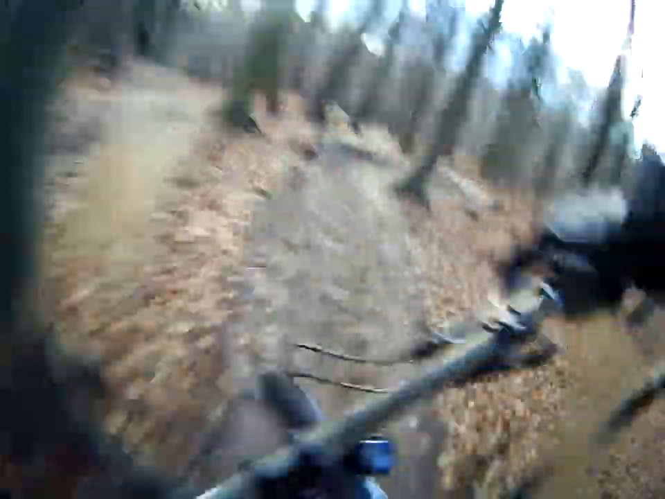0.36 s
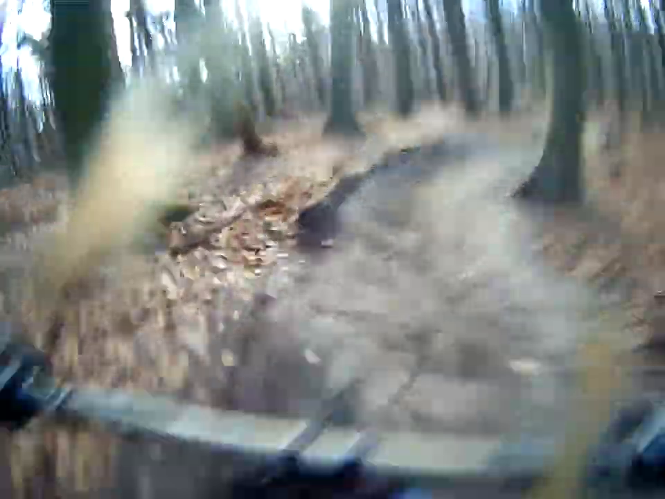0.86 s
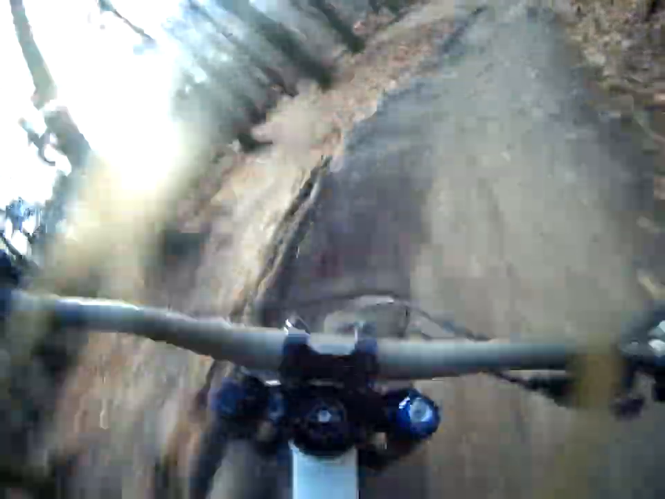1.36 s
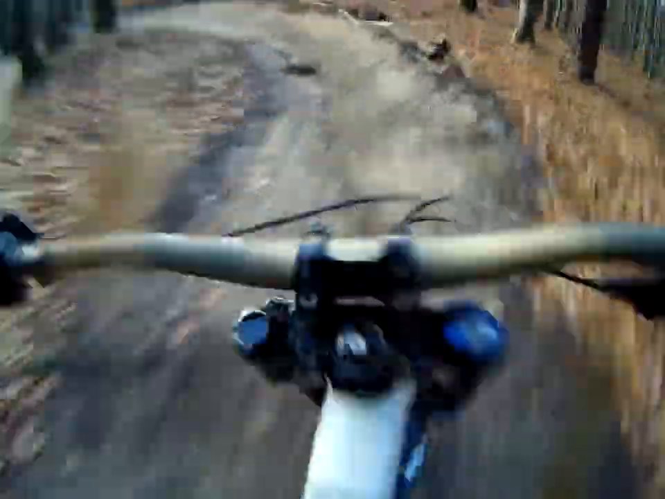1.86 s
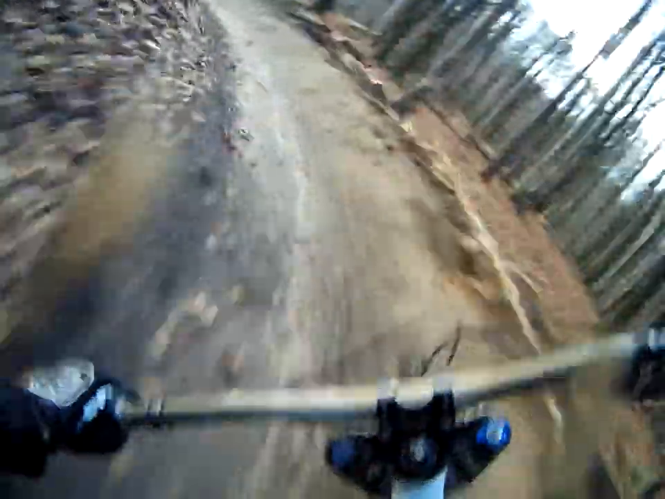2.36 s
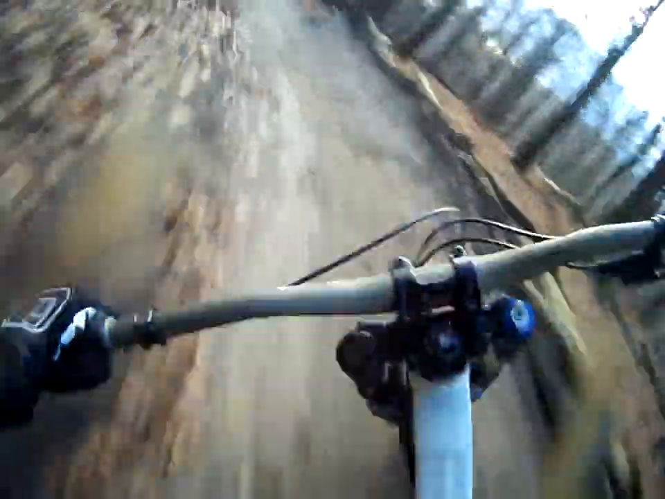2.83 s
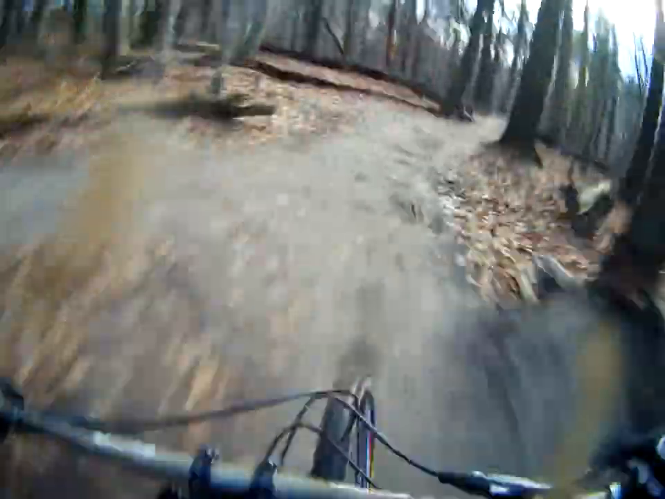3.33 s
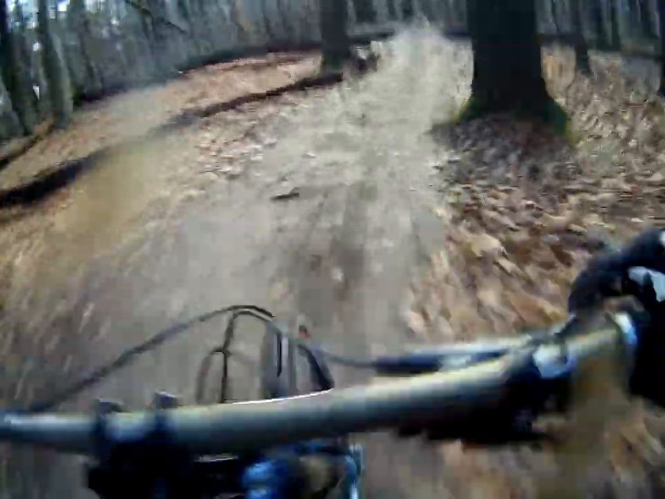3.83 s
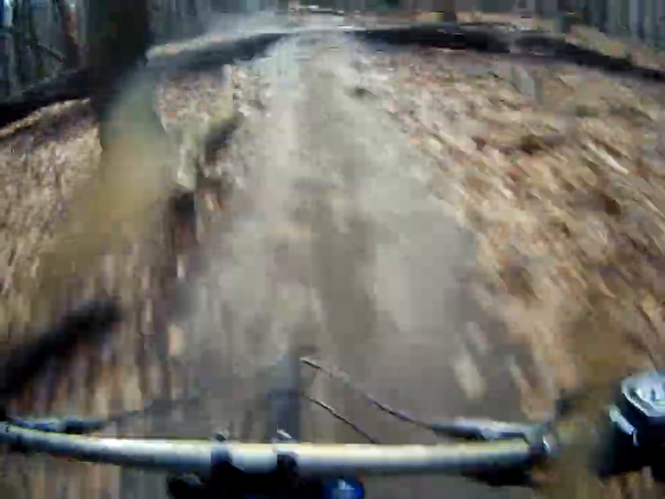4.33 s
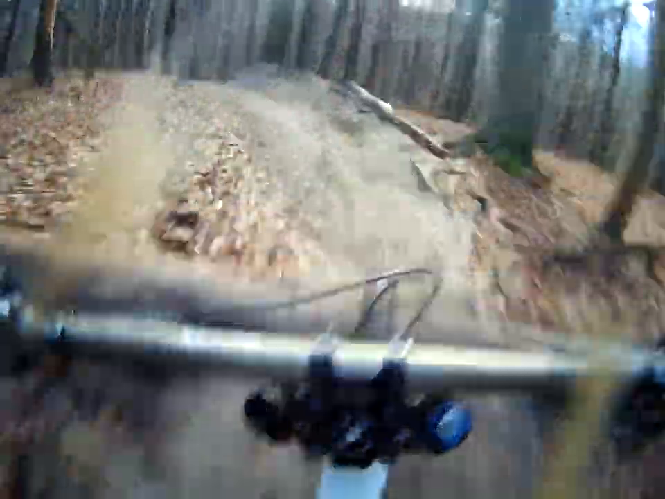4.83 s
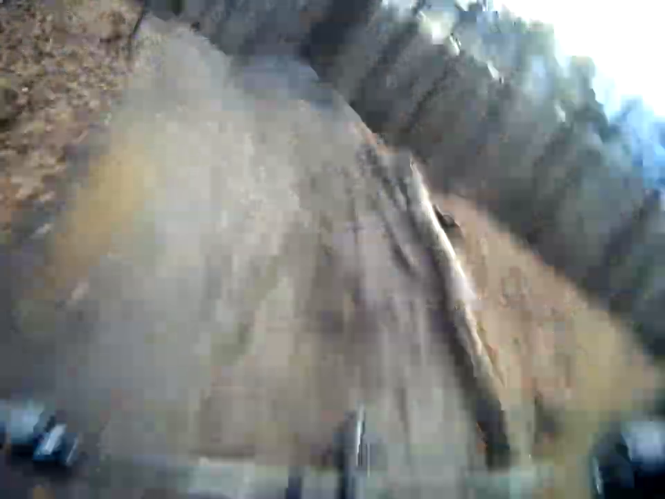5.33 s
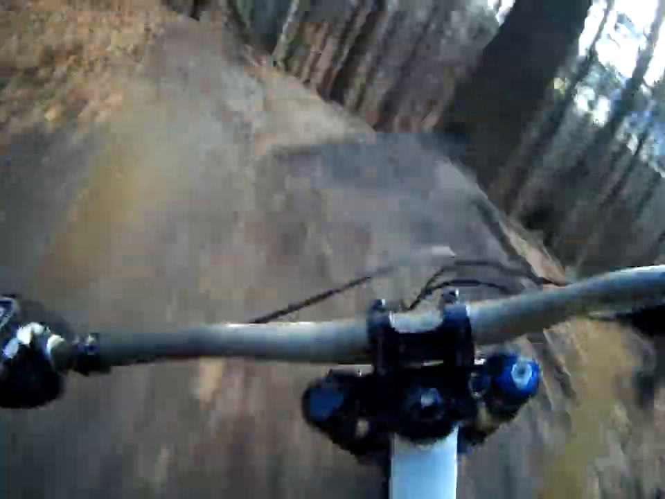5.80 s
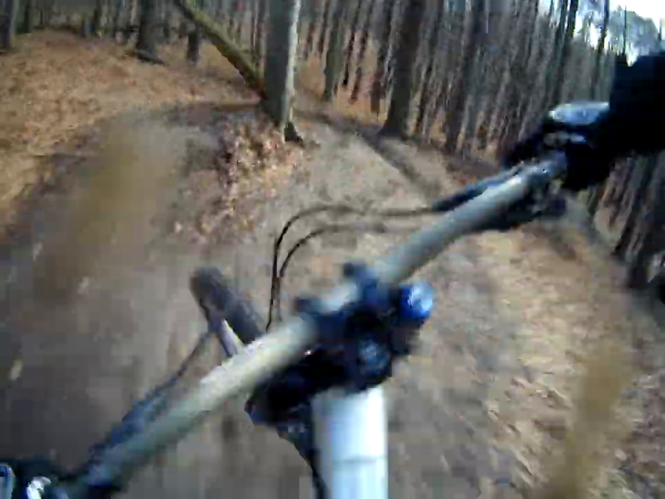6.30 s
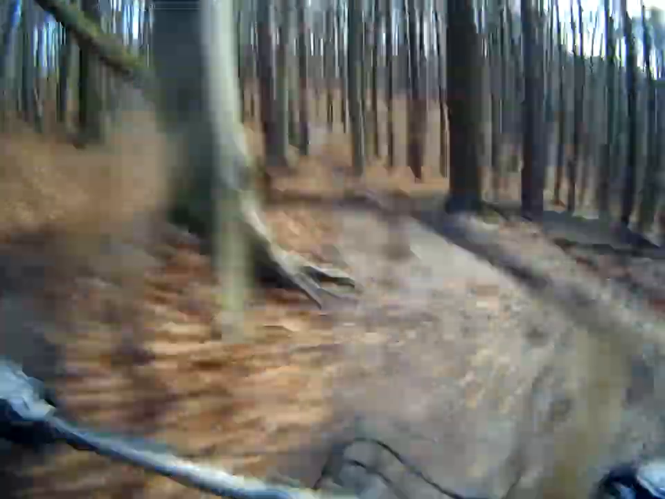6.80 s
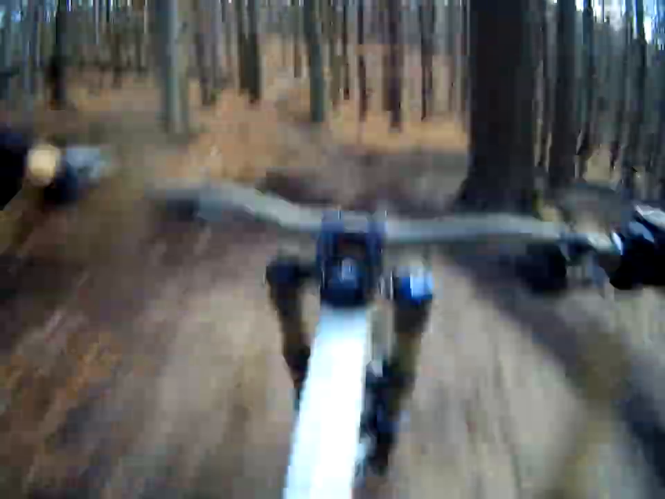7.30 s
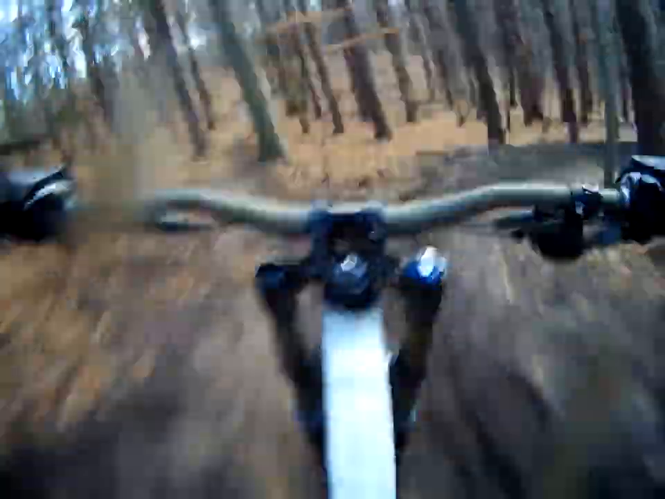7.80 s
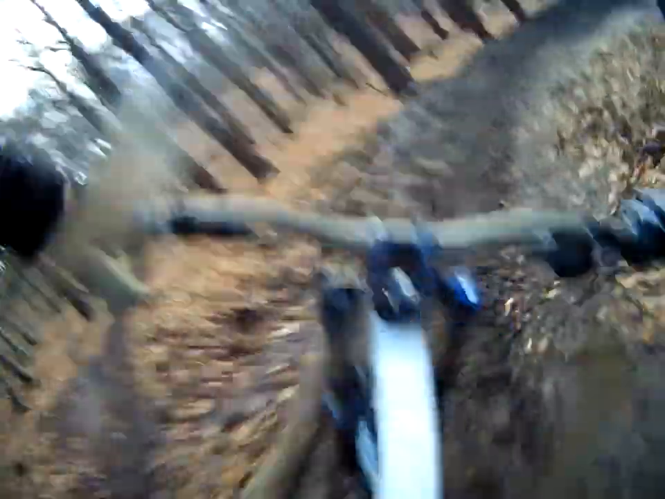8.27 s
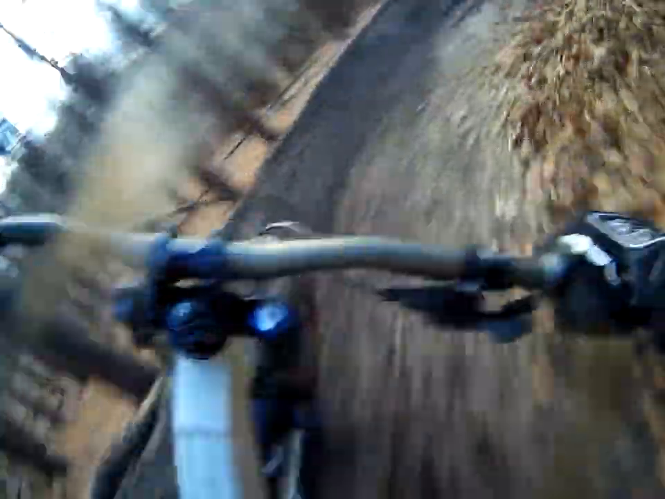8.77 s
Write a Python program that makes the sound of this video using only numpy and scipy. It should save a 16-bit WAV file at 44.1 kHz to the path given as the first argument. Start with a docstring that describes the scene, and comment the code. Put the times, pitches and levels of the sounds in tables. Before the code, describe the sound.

A mountain bike tears down a leafy dirt trail, tyres rumbling and crunching, with boxy clacks, ticks and one heavy jolt close to the microphone.

```python
"""Tyres rumble and crunch fast down a leafy forest trail, with jolts, clacks and ticks close to the microphone.
The bike is heard from inside a sealed plastic case on the rider's chest: shaped noise makes wind, tyres and
rattle, scattered impacts make the grit, and single blows ring the same decaying case resonances.
One microphone feeds two unequal amplifier channels, each with its own offset."""
import sys
import numpy as np
from scipy import signal
from scipy.io import wavfile
from scipy.ndimage import uniform_filter1d

SR = 44100
rng = np.random.default_rng(int(sys.argv[2]) if len(sys.argv) > 2 else 0)


def to_linear_factor(level_db):
    """Convert decibel levels (scalar or array-like) to linear amplitude factors."""
    exponent = np.asarray(level_db, float) / 20
    return 10 ** exponent


def generate_wav(sig):
    """Save sig (samples, or channels by samples) to the path in sys.argv[1] as 16-bit PCM at SR."""
    pcm = np.round(np.clip(np.atleast_2d(sig).T, -1, 1) * 32767).astype(np.int16)
    wavfile.write(sys.argv[1], SR, pcm)


N = 392490
T = np.arange(N) / SR
# resonances of case and harness, levels relative: f/Hz, level/dB, t60/s at damping 1
CASE_MODES = [(84.6, -2.5, 0.14), (289, 0, 0.04), (392.4, 29, 0.02), (514, -21, 0.04), (742, 8.5, 0.051),
              (790, 11, 0.0067), (1092, 5, 0.032), (1710, 3, 0.011), (2050, -3.5, 0.022),
              (2392, -3.5, 0.016), (3190, -13.5, 0.0091), (3860, -13, 0.012), (4730, -7.5, 0.0045),
              (5480, -7.5, 0.0025), (6530, -11, 0.015), (6950, -15.5, 0.0043), (8130, -32.5, 0.015),
              (7960, -28, 0.011), (12500, -50, .003)]


def band(x, lo_hz, hi_hz, order=2):
    """Band-pass, scaled to unit rms."""
    y = signal.sosfilt(signal.butter(order, [lo_hz, hi_hz], "bandpass", fs=SR, output="sos"), x)
    return y / np.std(y)


def walk(rate):
    """Random levels held 1 / rate s and slewed; it dips freely but its peaks are rounded off."""
    hold = int(SR / rate)
    steps = np.repeat(rng.standard_normal(N // hold + 1), hold)
    w = 1.1 * uniform_filter1d(uniform_filter1d(steps, hold), hold)[:N]
    return np.where(w > 0, np.tanh(w), w)


def swells(table):
    """Sum of bell-shaped level swells, from rows of t/s, level/dB, half length/s."""
    return sum(to_linear_factor(db) * np.exp(-((T - s) / half) ** 2) for s, db, half in table)


def trail(column):
    """One level curve of the trail, in dB at every sample, sinking while the wheels fly."""
    # along the trail: t/s, crunch of leaves and stones level/dB, tyre rumble level/dB,
    # wind push level/dB, rattle of frame and chain level/dB
    course = np.transpose([(0.0, -57, -68, -56, -61), (0.22, -54, -56, -50, -56.5),
                           (0.35, -58, -56.5, -44, -55.5), (0.49, -66, -60, -55, -64.5),
                           (0.67, -63, -67, -62, -62), (0.79, -60, -66, -56, -60.5),
                           (0.94, -53.5, -54.5, -51, -54), (1.04, -54.5, -55.5, -49, -53.5),
                           (1.21, -58, -58, -61, -55), (1.41, -54, -62.5, -50, -57.5),
                           (1.53, -51.5, -54.5, -50, -54), (1.66, -52.5, -55, -47, -55.5),
                           (1.83, -58.5, -60.5, -62, -58.5), (2.05, -60.5, -60.5, -65, -60),
                           (2.3, -59.5, -60, -58.5, -59.5), (2.77, -59, -62.5, -59.5, -62.5),
                           (2.97, -60.5, -58, -66, -60), (3.3, -61.5, -65.5, -56, -59),
                           (3.49, -58, -60.5, -68, -61.5), (3.67, -59, -63, -73, -62.5),
                           (3.74, -60.5, -65, -67, -61), (4.21, -60, -60.5, -56, -61),
                           (4.34, -59, -59.5, -58, -60.5), (4.49, -60, -64, -69, -62.5),
                           (4.78, -59, -63, -56, -63.5), (4.93, -60, -61.5, -66, -59.5),
                           (5.18, -60, -63.5, -61, -56.5), (5.43, -59.5, -57.5, -61, -58.5),
                           (5.57, -54, -55.5, -48.5, -55), (5.82, -62, -67, -61.5, -63),
                           (6.1, -62.5, -58, -74, -63.5), (6.29, -64, -64, -53, -62),
                           (6.52, -65.5, -61, -74, -60.5), (6.69, -65, -57, -78, -60.5),
                           (6.82, -63.5, -59.5, -48, -59.5), (6.96, -53, -54, -60, -53),
                           (7.19, -51, -61, -55, -57), (7.34, -53, -55, -45, -50.5),
                           (7.51, -53.5, -53.5, -58, -51), (7.73, -47, -53, -50, -48),
                           (7.91, -50, -64, -66, -51.5), (8.13, -50.5, -54.5, -47, -52.5),
                           (8.33, -48, -53.5, -47, -48), (8.45, -47.5, -52, -47, -50),
                           (8.65, -54.5, -53.5, -50, -54), (8.9, -56, -54.5, -52, -55.5)])
    # wheels off the ground: take-off t/s, landing t/s, level change reached at landing/dB
    airborne = [(0.458, 0.754, -5), (6.389, 6.766, -5)]
    # the level sinks steadily in the air and is back at once on landing
    flying = sum(db * (T - up) / (down - up) * (T > up) * (T < down) for up, down, db in airborne)
    return np.interp(T, course[0], course[column]) + flying


def modes(damping=1):
    """One decaying ring a row, of equal energy before the table's levels."""
    f, db, t60 = (c[:, None] for c in np.transpose(CASE_MODES))
    t, t60 = T[:SR // 6], t60 / damping
    return to_linear_factor(db) * np.exp(-np.log(1000) * t / t60) * np.sin(2 * np.pi * f * t) / np.sqrt(t60)


def through_case(x, lo_hz, hi_hz, air):
    """Sound rung through the case walls plus a share that leaks in flat through the seal."""
    # alternate modes swing in opposite sense at the microphone, which fills the gaps between them
    response = (-1.) ** np.arange(len(CASE_MODES)) @ modes(damping=0.88)
    rung = band(signal.fftconvolve(x, response)[:N], lo_hz, hi_hz)
    leak = air * band(x, lo_hz, hi_hz)
    return band(rung + leak, lo_hz * 0.91, hi_hz * 3.1)


def grit(rate, scatter_db, smear_ms, patchy_db, patch_rate, rub=0.72):
    """Small impacts of uneven size over a steady rub, coming in patches, each a short scrape."""
    struck = rng.random(N) < rate / SR
    size = struck * to_linear_factor(scatter_db * np.minimum(rng.exponential(size=N), 2.5))
    power = signal.lfilter([1], [1, -np.exp(-2000 / (smear_ms * SR))], size ** 2)
    return to_linear_factor(patchy_db * walk(patch_rate)) * np.sqrt(power + rub) * rng.standard_normal(N)


def wind(gusts):
    """Wind pushes the case: gusty noise far down in the bass."""
    return to_linear_factor(trail(column=3)) * band(to_linear_factor(4.5 * gusts) * rng.standard_normal(N), 4, 36)


def harness_shake(ground, gusts):
    """Wind and ground together shake the harness: sparse low impacts at the mean of both levels."""
    shake = np.sqrt(to_linear_factor(trail(column=3)) * to_linear_factor(trail(column=2)))
    knocks = grit(rate=14, scatter_db=1.0, smear_ms=6.1, patchy_db=5, patch_rate=16)
    return shake * to_linear_factor(3 * ground + 3 * gusts) * through_case(knocks, 66, 108, air=0.12)


def swishes():
    """A swish is an even rush of air and fine grit, not single stones."""
    # treble from swept leaves and the suspension after landings: t/s, hiss level/dB, half length/s
    puffs = swells([(0.284, -65.5, 0.15), (1.066, -64, 0.047), (1.58, -66, 0.24), (5.15, -56.5, 0.049),
                    (5.53, -66.5, 0.054), (7.262, -52.5, 0.024), (7.724, -45, 0.015), (8.017, -66.5, 0.068),
                    (8.327, -64, 0.12)])
    rush = grit(rate=360, scatter_db=6, smear_ms=2, patchy_db=1, patch_rate=34, rub=2.5)
    body = to_linear_factor(11) * through_case(rush, 3000, 7100, air=0.28)
    return puffs * (body + band(rush, 3200, 6600, order=1))


def brief_swells():
    """Level curve of the moments at which rattle and crunch swell together."""
    # short swells of rattle and crunch: t/s, level/dB, half length/s
    moments = [(0.91, -53.5, 0.059), (1.048, -52.5, 0.019), (2.464, -60, 0.035), (5.418, -46, 0.013),
               (5.515, -49.5, 0.079), (6.204, -45.5, 0.02), (6.868, -48.5, 0.082), (7.018, -56, 0.021),
               (7.171, -45.5, 0.016), (7.305, -44.5, 0.024), (7.433, -67, 0.009), (7.638, -57, .03),
               (7.912, -50, 0.016), (8.196, -65, 0.019), (8.256, -50, .025), (8.384, -64, 0.0089),
               (8.439, -52, 0.0092), (8.537, -55, 0.016), (8.677, -58.5, 0.025), (8.842, -58, .02)]
    return swells(moments)


def rattle(swell, uneven):
    """Frame and chain rattle: dense uneven impacts in the middle of the spectrum, with short swells."""
    knocks = grit(rate=130, scatter_db=4.5, smear_ms=3.5, patchy_db=3, patch_rate=45, rub=.3)
    return (to_linear_factor(trail(column=4)) + swell) * uneven * through_case(knocks, 1080, 3300, air=.5)


def crunch(swell, ground, uneven):
    """Stones and leaves crunch through the case; the same impacts also hiss, unrung."""
    level = to_linear_factor(trail(column=1)) + to_linear_factor(-5) * swell
    leaves = grit(rate=140, scatter_db=4, smear_ms=2.4, patchy_db=2.5, patch_rate=45, rub=.4)
    hiss = to_linear_factor(-19) * level * to_linear_factor(0.4 * ground) * band(leaves, 2900, 6700, order=1)
    return level * uneven * through_case(leaves, 2576, 5870, air=0.31) + hiss


def tyre_rumble(ground):
    """Low rumble in short uneven bursts, weaker in between, with brief deep dips."""
    # brief dips of the rumble: t/s, half length/s
    dips = [(0.097, .012), (0.663, 0.0093), (1.273, .02), (1.323, .025), (2.022, 0.024), (3.3, 0.016),
            (3.39, .03), (3.599, 0.032), (3.829, 0.014), (3.913, 0.016), (4.547, 0.015), (4.605, 0.016),
            (4.93, .022), (4.983, .02), (5.26, 0.025), (5.356, 0.026), (5.77, 0.012), (6.05, .02),
            (6.443, 0.0096), (6.566, 0.034), (6.725, 0.026), (8.024, 0.016), (8.886, 0.02)]
    dip_db = -22 * sum(np.exp(-((T - s) / half) ** 4) for s, half in dips)
    bursts = to_linear_factor(.5 * ground + 9 * np.tanh(3.5 * walk(95) + .4 * walk(25) + 1.1))
    rumble = grit(rate=45, scatter_db=2.5, smear_ms=4.6, patchy_db=3.0, patch_rate=30)
    return to_linear_factor(trail(column=2)) * to_linear_factor(dip_db) * bursts * through_case(rumble, 252, 561, air=1.23)


def rolling():
    """The trail shakes the case all the time; the layers share the same swings of ground and gusts."""
    ground, gusts = walk(22), walk(25)
    uneven = to_linear_factor(2.1 * ground + 2 * walk(60))
    swell = brief_swells()
    out = wind(gusts) + harness_shake(ground, gusts) + swishes()
    return out + rattle(swell, uneven) + crunch(swell, ground, uneven) + tyre_rumble(ground)


def snaps():
    """Each twig is a burst of noise that reaches the seal unrung, treble only."""
    # twigs snapping, thin and bright: t/s, level before the band-pass/dB
    twigs = [(0.103, -38), (0.767, -35.5), (1.6123, -57.5), (1.6786, -37), (1.7849, -57), (1.8615, -41),
             (3.287, -56), (5.4974, -62), (6.7815, -43), (6.8334, -59), (6.8913, -51), (7.3987, -38),
             (7.6705, -45), (7.719, -21), (7.774, -28), (7.8521, -48), (7.988, -30), (8.045, -33),
             (8.2906, -40), (8.461, -41), (8.561, -35), (8.5859, -48)]
    decay_ms = 1.3
    out, t = np.zeros(N + SR), T[:SR // 100]
    for (s, db), noise in zip(twigs, rng.standard_normal((len(twigs), len(t)))):
        out[int(s * SR):][:len(t)] += to_linear_factor(db) * noise * np.exp(-t * 1000 / decay_ms)
    return signal.sosfilt(signal.butter(1, [6500, 11000], "bandpass", fs=SR, output="sos"), out[:N])


def shoves():
    """Pressure in the case drops, then overshoots and settles more slowly."""
    # the chest shoving the case in one slow swing: t/s, level/dB, time from dip to overshoot/ms
    pushes = [(0.913, -34, 6.7), (0.995, -35, 2.4), (7.296, -35, 7.9)]

    def swing(u):
        drop = u * np.exp(.5 - u ** 2 / 2) * (u < 0)
        overshoot = u * np.exp(1 - np.abs(u)) * (u >= 0)
        return drop + overshoot

    return sum(to_linear_factor(db) * swing((T - s) * 2000 / ms) for s, db, ms in pushes)


def stray(count, lo_hz, hi_hz, over_db, scatter_db, column):
    """Small blows at chance moments and pitches, denser and stronger where the ground is rough."""
    share, pitch, size = rng.random((count, 3)).T
    level_db = trail(column)
    odds = np.cumsum(to_linear_factor(level_db))
    i = np.searchsorted(odds, share * odds[-1])
    blow_db = level_db[i] + over_db - scatter_db * size
    return list(zip(T[i], blow_db, lo_hz * (hi_hz / lo_hz) ** pitch))


def blows(table, usual_ms, octaves, rough, rise, bloom_cycles, choke_cycles, snap, even):
    """Each blow is a tap plus a scrape that swells and dies; it favours the modes near its pitch."""
    out, t, rings = np.zeros(N + SR), T[:SR // 25], modes()
    ring_t = T[:rings.shape[1]]
    f, mode_db, _ = np.transpose(CASE_MODES)
    for (s, db, hz, *own_ms), noise in zip(table, rng.standard_normal((len(table), len(t)))):
        ms = own_ms[0] if own_ms else usual_ms
        u = t / (max(ms, .2) / 1000)
        scrape = noise * (1 - np.exp(-u / rise)) * np.exp(-u)
        force = rough * scrape / np.linalg.norm(scrape) * ms
        force[0] = 1  # the tap
        # a hard edge reaches further up than down, and blows above -20.5 dB ring a wider share
        reach = np.where(f > hz, octaves, octaves / 2) * np.exp(.015 * (db + 20.5))
        # even = how far a direct blow levels the modes out
        weight = np.exp(-np.abs(np.log2(f / hz)) / reach) / to_linear_factor(even * mode_db)
        # the shock needs a moment to spread through the walls, so the ring blooms instead of clicking
        bloom = (1 - np.exp(-ring_t * hz / bloom_cycles)) ** 2
        # the strap pulls the case back against the chest and chokes the tail
        choke = np.exp(-(ring_t * hz / choke_cycles) ** 2)
        ring = signal.fftconvolve(force, bloom * choke * (weight @ rings))
        ring /= np.abs(ring).max()
        # the dry edge of the scrape also arrives through the air, bright and unrung
        ring[:len(t) - 1] += snap * np.diff(scrape)
        i = int(s * SR)
        out[i:i + len(ring)] += to_linear_factor(db) * ring
    return out[:N]


def ticks():
    """Grit, twigs and cables tick: rough scrapes ringing the high modes."""
    # t/s, level/dB, f/Hz
    taps = [(0.1038, -37, 5400), (1.448, -27.5, 3860), (1.6136, -26.5, 5540), (1.6777, -22, 5150),
            (1.786, -34.5, 5600), (1.8635, -35, 4550), (2.35, -39.5, 5100), (2.583, -38, 4640),
            (2.79, -44.5, 4770), (2.855, -39.5, 5040), (3.12, -43.5, 5040), (3.17, -40.5, 5100),
            (3.2873, -33, 5260), (3.923, -38.5, 5130), (4.0407, -36, 4150), (4.1937, -39, 5200),
            (5.035, -33, 5000), (5.051, -37, 5370), (5.097, -40, 4700), (5.4978, -26, 4430),
            (5.612, -39, 4900), (5.6563, -36, 5600), (5.742, -40, 5200), (5.86, -48, 5100),
            (6.009, -44, 4800), (6.074, -44, 5400), (6.168, -37, 5270), (6.8334, -27.5, 4400),
            (6.8942, -22.5, 3560), (7.1591, -32, 3400), (7.249, -31, 4770), (7.26, -32, 4970),
            (7.485, -35, 4700), (7.5176, -27, 4350), (7.545, -40, 6200), (7.588, -32, 4900),
            (7.616, -39, 5500), (7.6438, -22, 4700), (7.709, -30, 6100), (7.7189, -22, 3360),
            (7.7195, -18.5, 5350), (7.726, -20.5, 6600), (7.7748, -32.5, 5140), (7.8535, -30.5, 5660),
            (8.148, -34, 5400), (8.2316, -25.5, 4370), (8.284, -29.5, 4500), (8.367, -25.5, 4300),
            (8.385, -27.5, 5260), (8.408, -38, 5870), (8.5385, -27.5, 4600), (8.588, -30, 5700),
            (8.6075, -30, 5100), (8.676, -33.5, 4700)]
    taps = taps + stray(count=150, lo_hz=3680, hi_hz=6000, over_db=15, scatter_db=8, column=1)
    return blows(taps, usual_ms=3.5, octaves=0.34, rough=0.54, rise=0.15, bloom_cycles=0.58,
                 choke_cycles=26, snap=0.004, even=.3)


def thuds():
    """The harness thuds on the chest: dull blows ringing the lowest modes."""
    # t/s, level/dB
    bumps = [(0.297, -47), (0.388, -33), (0.767, -28), (0.897, -36), (1.2128, -41), (1.51, -35),
             (1.6747, -31.5), (2.072, -44.5), (5.4528, -39), (6.779, -29), (6.893, -26), (7.2878, -32.5),
             (7.3283, -30), (7.552, -36), (7.699, -27), (7.8805, -23), (8.069, -32), (8.157, -31),
             (8.26, -32.5), (8.578, -37), (8.623, -34.5)]
    return blows([(s, db, 84) for s, db in bumps], usual_ms=6.7, octaves=0.73, rough=0.2, rise=0.87,
                 bloom_cycles=0.054, choke_cycles=6.8, snap=0, even=0.27)


def clacks():
    """Hard parts clack on the case and ring its middle modes."""
    # t/s, level/dB, f/Hz, scrape decay/ms
    knocks = [(0.383, -26, 1840, 4), (0.5018, -31.5, 1280, 0.9), (0.7595, -35.5, 2440, 1.6),
              (0.768, -28.5, 3070, .8), (0.8914, -36.5, 2010, 9.3), (1.034, -43, 2430, 5.4),
              (1.5095, -37.5, 1660, 10), (2.0843, -38.5, 1190, 9.3), (3.348, -24, 1220, 3.1),
              (3.7652, -21, 1250, 3.6), (4.0415, -24.5, 1430, 2.4), (5.0361, -24.5, 1710, 0.83),
              (5.0587, -29, 1020, 2.5), (5.1378, -25, 1220, 2.9), (5.311, -25.5, 1180, 0.8),
              (5.419, -33, 2500, 4.8), (5.465, -42, 1630, 6.2), (5.566, -32, 2930, 5.3),
              (5.62, -44.5, 2400, 6), (5.683, -43, 2380, 13), (6.198, -33.5, 1710, 4.3),
              (6.224, -44, 1700, 3.3), (6.2506, -18.5, 1310, 2.3), (6.782, -28, 1860, 1.1),
              (6.789, -29.5, 2010, 1.5), (6.834, -37, 2380, 2.4), (6.8905, -17.5, 1810, 4.1),
              (6.9462, -55, 2450, 4.5), (7.1563, -34, 2680, 11), (7.2895, -25, 1330, 1.2),
              (7.3415, -33, 1870, 5), (7.426, -38, 2070, 3.7), (7.443, -32, 1940, 1.3),
              (7.4504, -23.5, 1700, 1), (7.4815, -37, 2900, 5.5), (7.5798, -39, 1700, 6.4),
              (7.6311, -24, 1710, 2), (7.6746, -32, 1710, 2), (7.695, -26, 2300, 4),
              (7.7195, -22.5, 1840, 0.6), (7.7738, -42, 2130, 1.6), (7.8207, -37, 1760, 2.5),
              (7.8537, -41, 1750, 2.7), (7.876, -24.5, 2050, 0.99), (8.0442, -52, 2050, 3),
              (8.0806, -36, 1690, 5.5), (8.148, -37, 2340, 3.3), (8.1693, -35, 1850, 5.8),
              (8.2009, -36, 2380, 3), (8.2137, -32.5, 2000, 1.8), (8.2511, -32, 1710, 1.4),
              (8.3215, -30, 1900, 1.8), (8.3499, -49, 2380, 12), (8.368, -28, 2400, 8.4),
              (8.4274, -30.5, 2450, 3.2), (8.4602, -26.5, 1980, 1.3), (8.506, -43, 1780, 1.1),
              (8.515, -26.5, 1830, 3.4), (8.6079, -37, 1780, 5.2)]
    knocks = knocks + stray(count=160, lo_hz=1190, hi_hz=2700, over_db=14.5, scatter_db=15.5, column=4)
    return blows(knocks, usual_ms=5.1, octaves=0.8, rough=0.15, rise=1.0, bloom_cycles=0.8,
                 choke_cycles=18, snap=0.006, even=0.4)


def jolts():
    """Bumps jolt the case: nearly clean taps, narrow around their pitch."""
    # t/s, level/dB, f/Hz
    bumps = [(0.39, -28, 372), (0.4334, -38, 380), (0.7607, -25, 450), (0.909, -36.5, 285),
             (1.5434, -29, 318), (1.6771, -27, 372), (2.0841, -36.5, 380), (3.7661, -30, 390),
             (4.0415, -40, 505), (5.0382, -31.5, 386), (5.1397, -29, 446), (5.4292, -34, 352),
             (5.5924, -38, 294), (6.2034, -33.5, 490), (6.783, -18.5, 471), (6.8925, -4, 287),
             (6.893, -9, 530), (6.9465, -27.5, 304), (7.1589, -31, 360), (7.2902, -19, 372),
             (7.5095, -38.5, 500), (7.5566, -33, 342), (7.6972, -14.5, 358), (7.6972, -13.5, 790),
             (7.7065, -21.5, 385), (7.7483, -27.5, 277), (7.878, -28, 343), (8.1385, -25, 365),
             (8.3531, -41, 340), (8.5168, -34, 414), (8.7339, -30, 365)]
    return blows(bumps, usual_ms=4, octaves=.3, rough=0.04, rise=0.9, bloom_cycles=0.42,
                 choke_cycles=4.8, snap=0, even=.9)


def scene():
    """Everything reaches the one microphone through the case."""
    hits = ticks() + thuds() + clacks() + jolts()
    return np.tile(rolling() + snaps() + shoves() + hits, (2, 1))


def top_cut(x):
    """Nothing passes above the cut-off."""
    return signal.sosfilt(signal.butter(12, 16120, fs=SR, output="sos"), x)


def record(dry):
    """The right channel lifts and delays the bass and dips above it; both round peaks, hiss, lose the top."""
    dip, knee = 2 * np.pi * 547, 2 * np.pi * 311  # rad/s
    shelf = signal.bilinear([1 / dip ** 2, 1 / (1.16 * dip), 1], [1 / knee ** 2, 1 / (.48 * knee), 1], SR)
    x = np.array([to_linear_factor(2.4) * dry[0], to_linear_factor(6.) * signal.lfilter(*shelf, dry[1])])
    x = 1.05 * np.tanh(x / 1.05)
    noise = rng.standard_normal((2, N))
    x += to_linear_factor(-62.0) * np.array([band(band(v, 830, 13000), 870, 3430, order=1) for v in noise])
    x = signal.sosfilt(signal.butter(4, 13000, fs=SR, output="sos"), x)
    # constant offset of each channel, full scale = 1: one row a channel, left then right
    offset = [
        [-.2102],
        [.2573],
    ]
    mix = x + np.array(offset)
    return top_cut(mix)


dry = scene()
out = record(dry)
generate_wav(out)
```